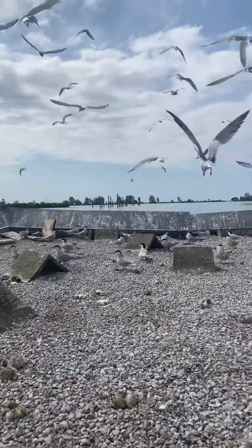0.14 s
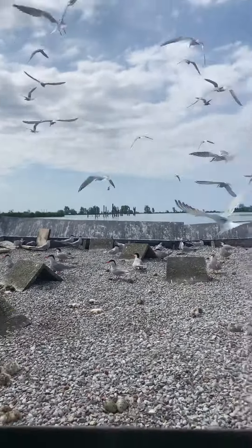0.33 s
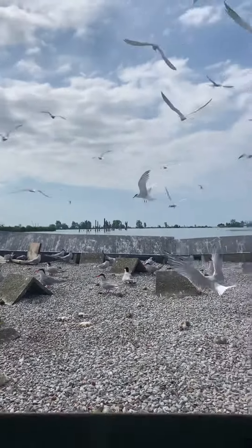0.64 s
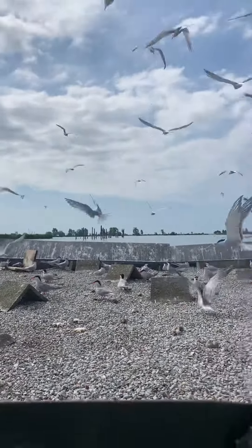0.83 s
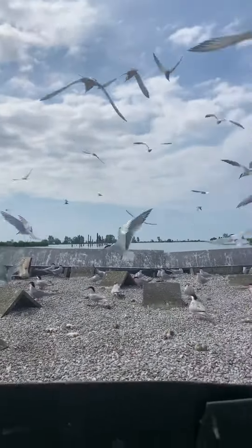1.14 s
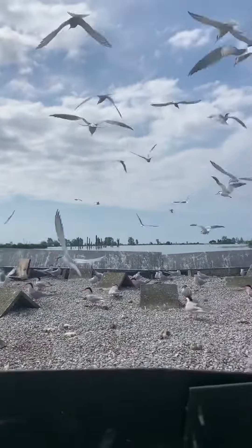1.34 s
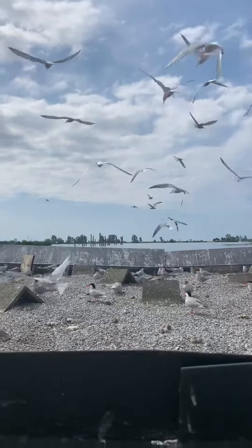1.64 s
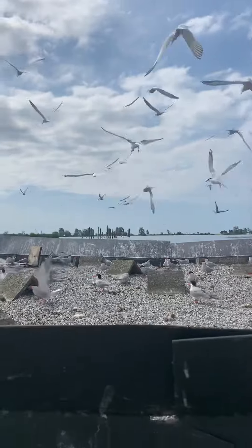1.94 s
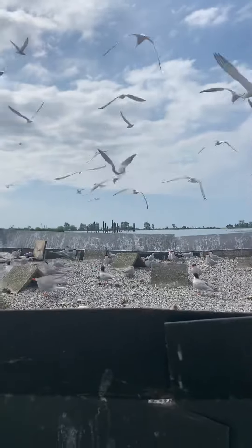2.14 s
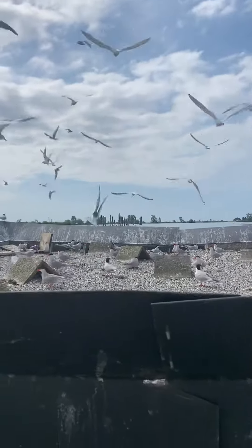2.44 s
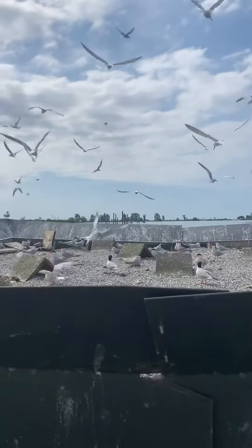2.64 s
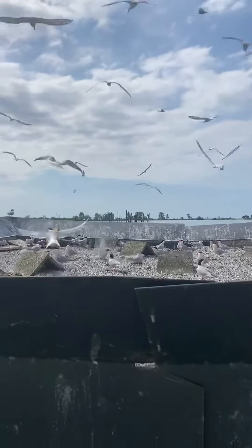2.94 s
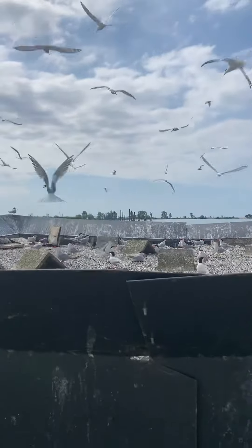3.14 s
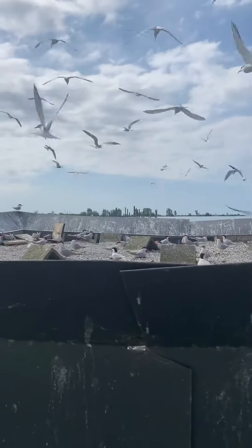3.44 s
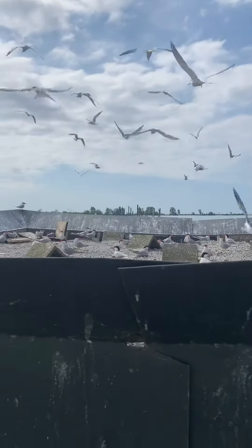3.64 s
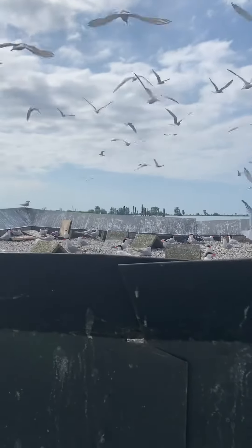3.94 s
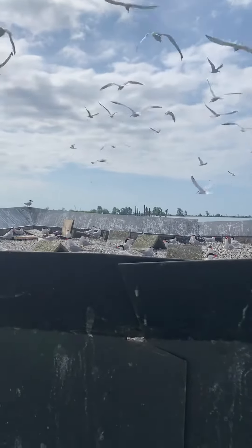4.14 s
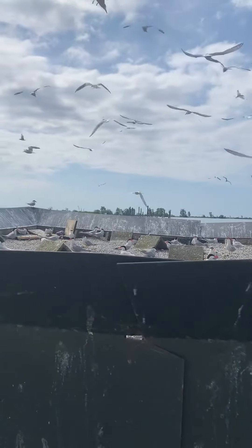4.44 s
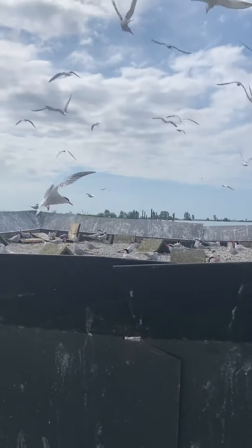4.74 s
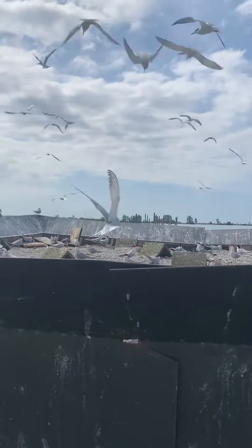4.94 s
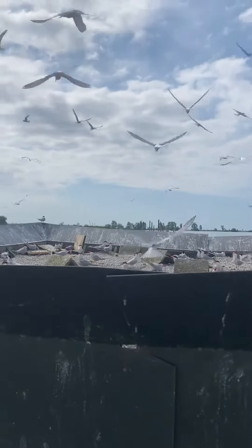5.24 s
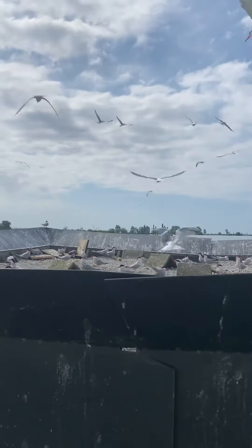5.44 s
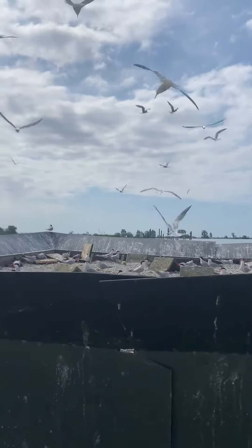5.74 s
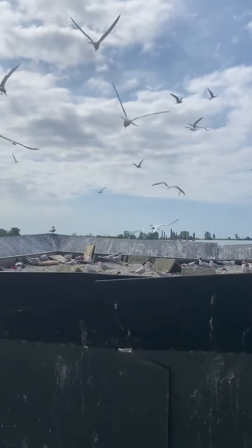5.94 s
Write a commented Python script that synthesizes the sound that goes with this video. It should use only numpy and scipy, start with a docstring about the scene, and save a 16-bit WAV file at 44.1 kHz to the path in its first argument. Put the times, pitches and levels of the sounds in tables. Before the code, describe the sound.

Dozens of alarmed terns circle overhead, giving sharp kips, falling cries and rattling rasps over a dense distant flock, with low wind rumble on the microphone.

```python
"""Alarmed terns circle overhead a gravel nesting raft: short "kip" notes, drawn-out "kee" cries, most falling,
some rising, rattling "karr" rasps, harsh barks and one close scream, over a farther flock and rumbling wind.
Calls are harmonics of an unsteady membrane shaped by throat and bill; the flock adds coloured noise.
Wind is noise on a closely spaced microphone pair; gravel and low walls answer with short noise tails."""
import sys
import numpy as np
from scipy import signal
from scipy.fft import rfft, irfft, next_fast_len
from scipy.io import wavfile
from scipy.ndimage import uniform_filter1d, map_coordinates

SR = 44100
rng = np.random.default_rng(int(sys.argv[2]) if len(sys.argv) > 2 else 0)


def master_out(mix):
    """Clip the mix to full scale and print it as 16-bit PCM to the path in sys.argv[1]."""
    frames = np.transpose(np.atleast_2d(mix))
    ceiling = np.clip(frames, -1, 1)
    pcm = np.round(ceiling * 32767).astype(np.int16)
    wavfile.write(sys.argv[1], SR, pcm)


N = 268348
TOP_HZ = 15800  # band limit of the voices and the output


def amp(db):
    """Decibels to gain."""
    return 10 ** (np.asarray(db) / 20)


def unit(x):
    """Scale to rms 1."""
    return x / np.sqrt(np.mean(x ** 2) + 1e-20)


def along(points, hz):
    """Interpolate (Hz, value) points on a log-frequency axis."""
    f, v = np.transpose(points)
    return np.interp(np.log(hz + 1), np.log(f + 1), v)


def curves(rows):
    """One value per sample for each column after the time."""
    s, *cols = np.transpose(rows)
    t = np.arange(N) / SR
    return [np.interp(t, s, c) for c in cols]


def wobble(knots_per_s, size):
    """Smooth random curve of size samples through normally distributed knots."""
    knots = rng.standard_normal(size // 8 + 8)
    return map_coordinates(knots, [np.arange(size) * knots_per_s / SR], mode="wrap")


def filtered(x, response):
    """Multiply the spectrum of x by response(hz)."""
    m = next_fast_len(N + SR // 4)
    hz = np.fft.rfftfreq(m, 1 / SR)
    return irfft(rfft(x, m) * response(hz), m)[..., :N]


def rush(spectrum, patchy_db):
    """Coloured noise of rms 1 with time-frequency patches of random gain."""
    z = signal.stft(rng.standard_normal(N), nperseg=512)[2]
    field = uniform_filter1d(rng.standard_normal(z.shape), size=4, axis=0)
    field = uniform_filter1d(field, size=10, axis=1)
    noise = signal.istft(z * amp(patchy_db * unit(field)), nperseg=512)[1][:N]
    return unit(filtered(noise, lambda hz: amp(along(spectrum, hz))))


def add(track, s, x):
    """Mix x into the track from time s on."""
    start = int(np.clip(s * SR, 0, N - 1))
    track[start:start + len(x)] += x[:N - start]


def progress(length_s):
    """0 to 1 over a call."""
    return np.linspace(0, 1, max(int(length_s * SR), 64))


def swell(u, rise, fall):
    """Envelope that opens and closes over the given shares of a call."""
    return np.sin(np.pi / 2 * np.clip(np.minimum(u / rise, (1 - u) / fall), 0, 1)) ** 2


def syrinx(pitch_hz, throat, tilt_db, jitter, rough, bill=lambda hz: 0):
    """Harmonics of an unsteady membrane, shaped by throat and bill; roughness smears each into a noise band."""
    size = len(pitch_hz)
    unsteady_hz = pitch_hz * (1 + jitter * wobble(705.6, size))
    phase = 2 * np.pi * np.cumsum(unsteady_hz) / SR
    flutter = 1 + rough * wobble(1100, size)
    k = np.arange(1, 10)[:, None]
    hz = k * pitch_hz
    # upper harmonics are beamed: each comes and goes as the bird turns its head
    beam_db = np.minimum(k - 1, 5) * .5 * np.array([wobble(25, size) for _ in k])
    gain_db = along(throat, hz) + tilt_db * np.log2(hz / 4000) + bill(hz) + beam_db
    gains = amp(gain_db) * (hz < TOP_HZ)
    return np.sqrt(2) * flutter * np.sum(gains * np.sin(k * phase), axis=0)


FULL_VOICE_DB = -26  # kip level at zero tilt
THINNING = 0.62  # softer kips are thinner: dB per octave per dB below full voice
# short notes: (time [s], pitch [Hz], level [dB])
KIPS = [(0.004, 1630, -22.5), (0.329, 1585, -26.5), (0.576, 1580, -51), (0.692, 1734, -34),
        (0.723, 1970, -33.5), (0.87, 1900, -64), (0.984, 1670, -54), (1.119, 1690, -38), (1.174, 1970, -42),
        (1.335, 1820, -38), (1.421, 1768, -26.5), (1.61, 1836, -30), (1.866, 1810, -40),
        (1.906, 1830, -32.5), (2.148, 1800, -40), (2.289, 1860, -55), (2.657, 1830, -32.5),
        (3.045, 1695, -42), (3.413, 1810, -55), (3.956, 1840, -22.5), (4.432, 1895, -33),
        (4.689, 1796, -40), (5.028, 1820, -36), (5.114, 1810, -40), (5.183, 1794, -29), (5.33, 1870, -44),
        (5.445, 1756, -40), (5.713, 1886, -25.5), (5.862, 1905, -37.5), (5.945, 1590, -28)]
# harsh barks: (time [s], level [dB], brightness [dB per octave])
BARKS = [(0.341, -24.5, 6), (0.477, -27, -2), (1.63, -23.5, 10.5), (2.022, -26, -2), (4.262, -26.5, 3),
         (4.423, -26, -2.5), (4.836, -26, 4), (5.193, -23, 0), (5.561, -27, 11), (5.743, -27, -3),
         (5.958, -24, 2)]
# drawn-out cries: (time [s], length [s], top pitch [Hz], pitch drop [share], crest position [share of cry],
#                   level [dB], brightness [dB per octave], hoarseness [0-1], bill resonance [Hz])
CRIES = [(0.366, 0.12, 1960, 0.15, 0.14, -23, -5, 0.45, 3350),
         (0.471, 0.057, 1733, .14, .25, -21.5, -12, 0.62, 3380),
         (0.576, 0.075, 1708, 0.083, 0.31, -28, -12, .3, 3400),
         (0.755, 0.12, 1738, 0.068, .35, -24.5, -1.5, 0.44, 3400),
         (0.759, 0.2, 1710, 0.072, 0.21, -54, 9.5, 0.13, 7040),
         (0.762, 0.089, 1974, 0.077, 0.27, -27.5, -16, 0.4, 3780),
         (0.794, 0.11, 1974, 0.17, 0.97, -38.5, 0.5, 0, 11200),
         (0.865, 0.06, 1506, 0.082, 0.089, -24, -6, 0.94, 2840),
         (1.215, 0.13, 2037, .11, 0.31, -20.5, -7, 0.2, 3460),
         (1.394, 0.087, 1965, 0.12, 0.19, -20.5, -2.5, 0.45, 3850),
         (1.476, 0.068, 1790, 0.072, 0.061, -32, 0, 0.1, 6000),
         (1.462, 0.27, 1423, 0.047, 0.98, -29, -7, 0.08, 5740),
         (1.963, 0.16, 1810, 0.11, 0.64, -35.5, 1, .4, 3500),
         (2.139, 0.1, 1800, 0.066, 0.17, -33.5, 0, 0.26, 3600),
         (2.284, 0.061, 1280, .03, 0.18, -28, -2, 0.4, 2550),
         (2.357, .06, 1514, 0.092, 0.14, -27, -7, 0.4, 2900),
         (2.582, 0.11, 1870, 0.021, .2, -33, -8, 0.05, 1900),
         (3.98, 0.032, 1530, .1, .1, -23.5, -5, 0.4, 2800),
         (4.377, 0.0706, 2050, .04, 0.49, -19.5, -8.5, 0.2, 5660),
         (4.415, 0.06, 1983, .13, 0.11, -21.5, -5.5, 0.34, 3700),
         (4.464, 0.058, 1656, .17, 0.057, -27, -8, 0.3, 3100),
         (4.707, 0.14, 1837, .09, 0.16, -26.5, -3.5, 0, 3600),
         (4.777, 0.11, 2055, 0.064, 0.27, -34, -3, .15, 4100),
         (4.836, 0.07, 1696, .05, 0.08, -30.5, -11, 0.05, 3300),
         (4.837, .028, 1538, 0.06, .2, -19.5, -11, 0.2, 3000),
         (5.185, 0.064, 1760, .06, .2, -33, -10, 0.37, 3500),
         (5.483, 0.12, 1745, 0.033, 0.63, -29.5, -3.5, 0.02, 3800),
         (5.715, 0.043, 1884, 0.08, 0.54, -19.5, -12.5, .15, 4000)]
# rattling calls: (time [s], length [s], pitch [Hz], upward glide [share], level [dB],
#                  brightness [dB per octave], hoarseness [0-1])
RASPS = [(0, 0.39, 1162, .03, -44, -4.5, 0.4), (0.175, 0.18, 1615, -0.031, -30.5, 4.5, 0.5),
         (0.331, 0.065, 1468, -0.048, -33, -5, 0.33), (0.421, 0.19, 1105, -0.045, -35.5, -2.5, 0.12),
         (0.64, 0.31, 1700, -0.08, -32.5, 1.5, 0.9), (0.648, 0.39, 1282, -0.0016, -35, 2, 0.43),
         (0.832, 0.18, 1487, 0.06, -40, 1, 0.4), (0.899, 0.29, 1650, 0.02, -32.5, -0.5, .85),
         (1.328, 0.13, 1579, -0.018, -31.5, 5, 0.79), (1.451, 0.16, 1667, -0.025, -29, 3, 0.4),
         (1.621, 0.2, 1627, -0.04, -34, -0.5, 0.7), (1.597, 0.2, 1062, -0.095, -39.5, -2.5, 0.45),
         (1.899, 0.3, 1690, -0.026, -36, 4, 0.6), (2.301, 0.26, 1363, 0.16, -39, 2.5, 0.41),
         (2.397, 0.27, 1610, -0.014, -31, 6, 0.28), (2.435, 0.12, 1406, 0.0193, -30, 0, 0.5),
         (2.851, 0.44, 1547, 0.015, -42, -4.5, 0.42), (3.204, 0.22, 1505, 0.023, -35.5, 10, 0.27),
         (3.273, 0.31, 1608, 0.02, -33, 4, 0.57), (3.562, 0.25, 1644, 0.02, -32, 4.5, 0.6),
         (3.737, 0.16, 1668, -0.06, -35, 14.5, 0.44), (3.745, 0.22, 1448, -0.027, -32.5, 6, 0.7),
         (3.809, 0.2, 1118, -0.061, -42.5, -4.5, 0.35), (4.026, 0.21, 1535, 0.083, -33, 1.5, 0.45),
         (4.216, 0.16, 1150, -0.064, -35.5, -0.5, 0.37), (4.282, 0.15, 1580, 0.033, -31, 3, 0.32),
         (4.472, 0.24, 1510, 0.042, -46.5, -7.5, 0.6), (4.892, 0.24, 1522, -0.03, -30, 2, 0.64),
         (5.152, 0.37, 1110, -0.049, -37, 1.5, 0.4), (5.299, 0.24, 1514, 0.032, -33, 0.5, 0.49),
         (5.609, 0.18, 1527, -0.011, -33.5, 5.5, 0), (5.873, 0.18, 1546, -0.033, -31, 1.5, 0.48)]


def near_birds():
    """Kips, barks, cries and rasps of the birds passing closest overhead, each voiced by its own membrane."""
    track = np.zeros(N)
    for s, pitch_hz, db in KIPS:
        add(track, s, kip(pitch_hz, db, THINNING * (FULL_VOICE_DB - db)))
    for s, db, tilt_db in BARKS:
        add(track, s, bark(db, tilt_db))
    for s, *call in CRIES:
        add(track, s, cry(*call))
    for s, *call in RASPS:
        add(track, s, rasp(*call))
    return track


KIP_S = .043
# throat and open bill: (frequency [Hz], gain [dB])
KIP_THROAT = [(1800, -17.5), (3400, -12), (5300, 2), (7300, -15), (10500, -15), (14500, -27)]


def kip(pitch_hz, db, tilt_db):
    """A short, rough-edged arch whose pitch sags and cracks as the bill shuts."""
    u = progress(KIP_S)
    arch = 1 - .24 * (u - .33) ** 2 - .08 * u ** 6
    jitter, rough = .004 + .028 * u ** 4, .15 + .55 * u ** 4
    tone = syrinx(pitch_hz * arch, KIP_THROAT, tilt_db, jitter, rough)
    return amp(db + 1.5) * swell(u, rise=.06, fall=.55) * tone


QUAVER, QUAVER_PER_S = .016, 120.7  # pitch quaver: share of pitch, knots per s
CRY_FLUTTER_DB = 3.2
BILL_DB, BILL_OCTAVES = 12.5, 0.53  # height and width of the bill's resonance
# throat and open bill: (frequency [Hz], gain [dB])
CRY_THROAT = [(1900, -21), (3500, -3), (5300, -5), (7300, -8.5), (10500, -2.5), (14500, -9)]


def cry(length_s, pitch_hz, drop, crest, db, tilt_db, hoarse, bill_hz):
    """A quavering note that arches over its crest and grows hoarser; the bird's gape favours one overtone."""
    u = progress(length_s)
    hoarse = np.clip(hoarse, 0, 1) + .15 + .35 * u ** 4
    course = ((u - crest) / max(crest, 1 - crest)) ** 2
    quaver = 1 + QUAVER * hoarse * wobble(QUAVER_PER_S, len(u))
    pitch = pitch_hz * (1 - drop * course) * quaver

    def bill(hz):
        """Resonance of the gape: 0 dB at its peak, -BILL_DB far away."""
        return BILL_DB * (np.exp(-(np.log2(hz / bill_hz) / BILL_OCTAVES) ** 2) - 1)

    tone = syrinx(pitch, CRY_THROAT, tilt_db, jitter=.014 * hoarse, rough=.6 * hoarse, bill=bill)
    flutter_db = CRY_FLUTTER_DB * wobble(110, len(u))
    return amp(db + flutter_db) * swell(u, rise=0.1, fall=0.15) * tone


RATTLE_HZ = 56.96  # central pulse rate
RATTLE_SKEW = 0.67  # below 1, each pulse opens faster than it closes
FULL_RATTLE_HZ = 1580  # pitch at which the pulse exponent reaches 1.3
RASP_ARCH = 0.03462  # share by which the arch starts and ends below its top
# throat and open bill: (frequency [Hz], gain [dB])
RASP_THROAT = [(1100, -9.5), (1700, -10), (2300, 0), (3200, 2.8), (5000, -4), (6300, -10), (7400, -20),
               (9200, -24), (14500, -46)]


def rasp(length_s, pitch_hz, glide, db, tilt_db, hoarse):
    """An arching voice chopped into a rattle, deeper at high pitch; hoarseness bends and roughens it."""
    u, hoarse = progress(length_s), np.clip(hoarse, .1, 1)
    size = len(u)
    rate_hz = RATTLE_HZ * np.exp(.12 * rng.standard_normal() + .12 * wobble(50, size))
    cycle = np.cumsum(rate_hz) / SR % 1
    pressure = np.abs(np.sin(np.pi * cycle ** RATTLE_SKEW))
    pressure_bend = .11 * hoarse * (pressure - .82)
    random_bend = (.005 + .045 * hoarse ** 2) * wobble(45, size)
    course = glide * (u - .5) + RASP_ARCH * (.5 - (2 * u - 1) ** 2)
    pitch = pitch_hz * (1 + course) * (1 + pressure_bend + random_bend)
    tone = syrinx(pitch, RASP_THROAT, tilt_db, jitter=.013 * hoarse, rough=.45 * hoarse)
    pulses = unit(0.08 + pressure ** (1.3 * (pitch_hz / FULL_RATTLE_HZ) ** 2))
    level_db = db - 1.5 + 1.17 * wobble(71.1, size)
    return amp(level_db) * pulses * swell(u, rise=0.02, fall=0.092) * tone


BARK_S, BARK_HZ = .037, 1650


def bark(db, tilt_db):
    """A forced note breaks into a rough crack; tanh bounds the membrane's swing."""
    u = progress(BARK_S)
    tone = syrinx(BARK_HZ * (1.05 - 0.2 * u), RASP_THROAT, tilt_db, jitter=0.055, rough=.9)
    forced = tone * amp(4.5 * wobble(476, len(u)))
    crack = np.tanh(.4 * unit(forced))
    return amp(db) * swell(u, rise=0.046, fall=0.11) * unit(crack)


# nearest bird, sinking into a low rough tail: (time [s], pitch [Hz], level [dB], roughness [0-1])
SCREAM = [(2.675, 1848, -24, 0.37), (2.69, 1905, -14, 0.1), (2.742, 1781, -22, 0.09),
          (2.768, 1647, -21, 0.26), (2.785, 1350, -35, 0.4), (2.812, 1320, -44, 0.4),
          (2.842, 1350, -48, 0.8)]
# throat and open bill: (frequency [Hz], gain [dB])
SCREAM_THROAT = [(1350, -3.5), (1900, -20.5), (2600, 15), (3800, -7.5), (4100, 3), (5600, -14), (7500, -19),
                 (11000, -29), (14500, -38)]


def scream():
    """One quavering note from close by; the membrane grows unsteady as its pitch gives way."""
    start_s, end_s = SCREAM[0][0], SCREAM[-1][0]
    span = slice(int(start_s * SR), int(end_s * SR))
    pitch, level_db, rough = [curve[span] for curve in curves(SCREAM)]
    size = len(pitch)
    quaver = 1 + QUAVER * wobble(QUAVER_PER_S, size)
    tone = syrinx(pitch * quaver, SCREAM_THROAT, 0, jitter=0.045 * rough, rough=rough)
    flutter_db = CRY_FLUTTER_DB * wobble(QUAVER_PER_S, size)
    envelope = swell(np.linspace(0, 1, size), rise=0.028, fall=0.056)
    track = np.zeros(N)
    add(track, start_s, amp(level_db + flutter_db) * envelope * tone)
    return track


STRAY_HZ, STRAY_SPREAD_HZ = 1540, 280  # lowest pitch, range above it
STRAY_DB, STRAY_SPREAD_DB = -44, 4  # faintest level, range above it
STRAY_TILT_DB = 8.5  # per octave


def stray_kips(count=12):
    """Birds a little farther off throw in faint kips, one at random in each equal slot."""
    track = np.zeros(N)
    for i, (when, voice, strength) in enumerate(rng.random((count, 3))):
        pitch_hz = STRAY_HZ + STRAY_SPREAD_HZ * voice
        note = kip(pitch_hz, STRAY_DB + STRAY_SPREAD_DB * strength, STRAY_TILT_DB)
        add(track, (i + when) / count * N / SR, note)
    return track


PATH_S = .12  # interval between echo-path changes
# decay of the scatter: (frequency [Hz], t60 [s])
RAFT = [(500, 0.16), (3000, 0.18), (12000, 0.019)]


def raft(x):
    """Scatter from gravel and low walls, dying fastest in the top treble; paths change as the birds fly."""
    track, hop = np.zeros(N), int(PATH_S * SR)
    starts = np.arange(0, N, hop)
    noise = rng.standard_normal((len(starts), SR // 6))
    hz, t, z = signal.stft(noise, SR, nperseg=256)
    decay = amp(-60 * t / along(RAFT, hz)[:, None])
    tails = signal.istft(z * decay, SR, nperseg=256)[1]
    delayed = np.pad(x, (SR // 200, 0))  # 5 ms
    fade = np.sin(np.linspace(0, np.pi, 2 * hop))
    for start, tail in zip(starts, tails):
        piece = delayed[start:start + 2 * hop]
        echo = signal.fftconvolve(piece * fade[:len(piece)], tail / np.linalg.norm(tail))
        add(track, start / SR, echo)
    return track


FAR_RASP_HZ, FAR_CRY_HZ, FAR_SPREAD_HZ = 1231.2, 1428, 720  # lowest pitches, range above them
FAR_SPREAD_DB = 6  # how much fainter the farthest are
FAR_GLIDE, FAR_HOARSE = .16, .62  # share of pitch; hoarseness 0-1
# voices as they arrive over the water: (frequency [Hz], gain [dB])
FAR_COLOUR = [(700, -15), (1300, -4), (1800, -2.5), (2600, -3), (3200, 1), (3900, 0.5), (6000, 1),
              (10000, -15), (15000, -12)]


def far_birds(count=66, dull_db=-5, cry_db=2.5):
    """Farther birds' gliding rasps and cries, each at its own pitch, dulled by distance and scattered."""
    track = np.zeros(N)
    for i, (when, far, voice, size, turn) in enumerate(rng.random((count, 5))):
        pitch_hz = FAR_RASP_HZ + FAR_SPREAD_HZ * voice
        glide = FAR_GLIDE * (2 * turn - 1.2)
        call = rasp(.09 + .13 * size, pitch_hz, glide, -FAR_SPREAD_DB * far, dull_db, FAR_HOARSE)
        add(track, (i + when - 1) / (count - 1) * N / SR, call)
    for i, (when, far, voice, size, turn) in enumerate(rng.random((count, 5))):
        pitch_hz = FAR_CRY_HZ + FAR_SPREAD_HZ * voice
        db = cry_db - FAR_SPREAD_DB * far
        call = cry(.04 + .08 * size, pitch_hz, FAR_GLIDE, .7 * turn, db, dull_db, FAR_HOARSE,
                   bill_hz=2 * pitch_hz)
        add(track, (i + when) / count * N / SR, call)
    scattered = track + amp(-8) * raft(track)
    return unit(filtered(scattered, lambda hz: amp(along(FAR_COLOUR, hz))))


BLUR = .6  # gain of calls too dense to tell apart, relative to the distinct far calls
FLOCK_DB, FLOCK_TREBLE_DB = 1.5, -8  # body and treble, relative to the FLOCK level
CHATTER_DB, CHATTER_PER_S = -1.04, 33  # treble wobble: depth, knots per s
# how hard the farther flock calls: (time [s], level [dB])
FLOCK = [(0.0, -28), (0.49, -28.5), (0.81, -25.5), (1.2, -32), (1.56, -26), (1.96, -31.5), (2.25, -33.5),
         (2.59, -30.5), (2.91, -32), (3.64, -29.5), (4.17, -31.5), (4.3, -30.5), (4.67, -29.5), (5.03, -28),
         (5.77, -31.5), (6.08, -28.5)]
# blurred calls: (frequency [Hz], density [dB per Hz])
DIN = [(530, -41), (900, -18), (1160, -8.5), (1460, -12.5), (1720, -19), (2010, -8), (2500, -4.5),
       (3140, -5.5), (4030, -3.5), (4300, -1.5), (5590, -63), (9460, -120)]
# their treble: (frequency [Hz], density [dB per Hz])
DIN_TREBLE = [(3000, -3.5), (4600, -55), (5600, 9), (7400, 4), (9000, 10.5), (12000, 1), (15500, -7)]


def flock():
    """Far calls and the colony's noise blur swell together; treble varies as birds turn to the microphone."""
    level_db, = curves(FLOCK)
    colony = unit(far_birds() + BLUR * rush(DIN, patchy_db=4.0))
    treble_db = FLOCK_TREBLE_DB + CHATTER_DB * wobble(CHATTER_PER_S, N)
    treble = amp(treble_db) * rush(DIN_TREBLE, patchy_db=5.5)
    return amp(level_db) * (amp(FLOCK_DB) * colony + treble)


WIND_DB, AIR_DB = 1, -48.0  # rumble relative to the WIND level; open air
GUST_DB, GUSTS_PER_S = -0.8, 10  # random swells: depth, knots per s
# strength of the breeze: (time [s], rumble level [dB])
WIND = [(0.0, -42.5), (0.7, -43), (1.4, -46), (2.05, -42.5), (2.45, -45.5), (2.8, -50), (3.1, -52.5),
        (3.84, -45), (4.3, -43.5), (4.85, -51), (5.23, -44), (6.08, -43.5)]
# rumble: (frequency [Hz], density [dB per Hz])
RUMBLE = [(12, -43), (25, -38), (42, -1), (60, 4.5), (175, -7.5), (307, -21.5), (400, -23.5), (520, -27),
          (880, -120)]
# open air: (frequency [Hz], density [dB per Hz])
AIR = [(100, 12), (170, 0.5), (300, 0), (500, 3), (750, -2.5), (1200, -1.5), (3000, -39)]
# single buffets: (centre time [s], gaussian sigma [s], level [dB], upper edge [Hz])
BUFFETS = [(0.175, 0.056, -39, 175), (1.03, 0.034, -34, 119), (1.225, 0.0076, -39, 503),
           (1.647, 0.023, -29.5, 80), (2.01, 0.012, -31.5, 148), (2.252, 0.0098, -31, 99),
           (2.542, 0.013, -25, 216), (2.565, 0.016, -25, 78.6), (2.672, 0.022, -34.5, 80),
           (4.364, 0.028, -33.5, 230), (5.673, 0.036, -34.5, 98), (5.974, 0.017, -32, 99),
           (6.06, 0.016, -25, 143)]


def wind():
    """Rumble and single buffets as low noise on the microphone, over a soft rush of open air."""
    rumble_db, = curves(WIND)
    gust_db = GUST_DB * wobble(GUSTS_PER_S, N)
    rumble = amp(rumble_db + WIND_DB + gust_db) * rush(RUMBLE, patchy_db=2.0)
    track = rumble + amp(AIR_DB) * rush(AIR, patchy_db=4.0)
    t = np.arange(N) / SR
    for s, sigma_s, db, edge_hz in BUFFETS:
        noise = rng.standard_normal(N)
        eddy = unit(filtered(noise, lambda hz: (hz > 40) / (1 + (hz / edge_hz) ** 4)))
        track += amp(db) * np.exp(-.5 * ((t - s) / sigma_s) ** 2) * eddy
    return track


# gain of the side signal, nearly none in some narrow bands: (frequency [Hz], gain [dB])
WIDTH = [(900, -6.5), (1400, -8.5), (2400, -5), (3300, -4), (4800, -73), (5800, -1.5), (7000, -18),
         (7900, -1), (9000, -39.5), (10000, -2.5), (13000, -9)]
# eddies that differ between the sides: (frequency [Hz], gain [dB])
WIND_WIDTH = [(40, -19), (100, -16), (200, -11), (400, -6)]


def scene():
    """Direct calls reach both sides alike; scatter, the flock all around and eddies differ between them."""
    near = near_birds() + scream() + stray_kips()
    common = near + amp(-14) * raft(near) + flock() + wind()
    # fresh draws, added to one side and subtracted from the other
    around = filtered(amp(-5) * raft(near) + flock(), lambda hz: amp(along(WIDTH, hz)))
    eddies = filtered(wind(), lambda hz: amp(along(WIND_WIDTH, hz)))
    side = around + eddies
    return amp(-0.5) * np.array([common + side, common - side])


LOW_CUT_HZ = 37  # the microphone's wind filter
# phase turn between the sides, rising in steps: (frequency [Hz], turn [rad])
PHASE_TURN = [(0, 0), (1800, .35), (2400, 1.3), (3300, 1.35), (4000, 2.1), (4550, 3.05), (4850, 3.2),
              (6400, 6.25), (7400, 6.35), (8400, 9.3), (9400, 9.55), (10400, 12.55), (11600, 12.6),
              (12700, 15.6), (13600, 15.8), (14700, 18.85)]


def record(dry):
    """The two sides are turned apart in phase by frequency; deepest rumble and all above TOP_HZ are cut."""
    def response(hz):
        """Half the turn on each side, low cut, band limit."""
        turn_rad = np.interp(hz, *np.transpose(PHASE_TURN)) * np.array([[.5], [-.5]])
        low_cut = 1 / np.sqrt(1 + (LOW_CUT_HZ / (hz + 1)) ** 10)
        return np.exp(1j * turn_rad) * low_cut * (hz < TOP_HZ)

    return filtered(dry, response)


dry = scene()
out = record(dry)
master_out(out)
```